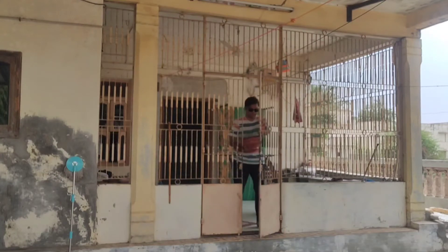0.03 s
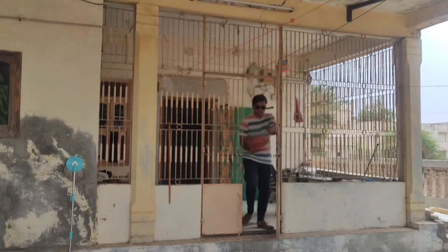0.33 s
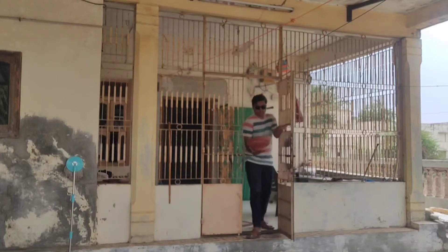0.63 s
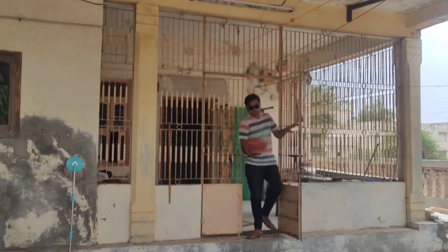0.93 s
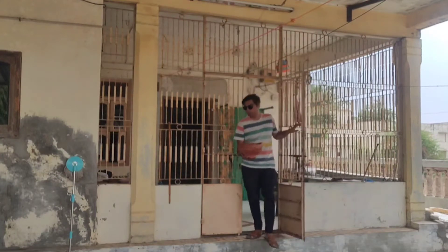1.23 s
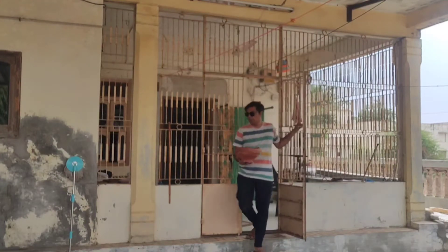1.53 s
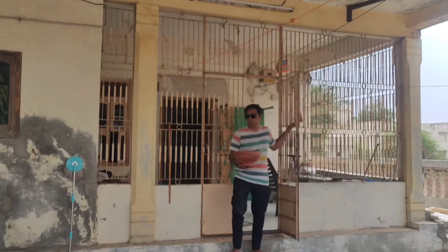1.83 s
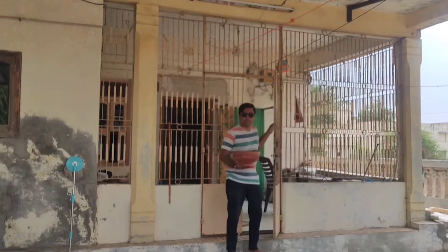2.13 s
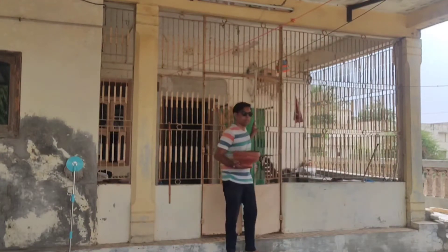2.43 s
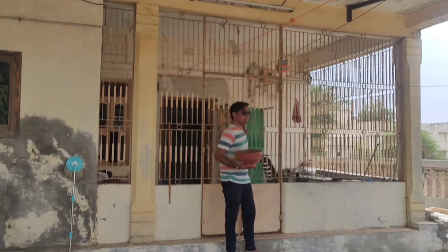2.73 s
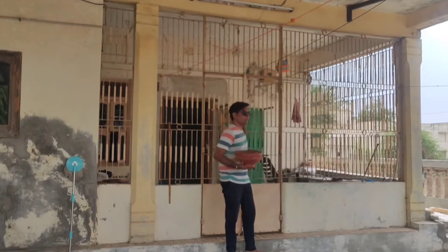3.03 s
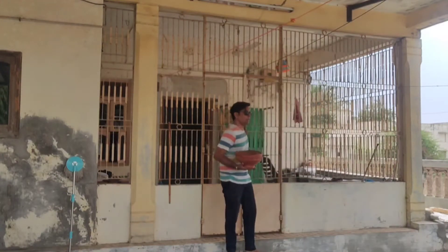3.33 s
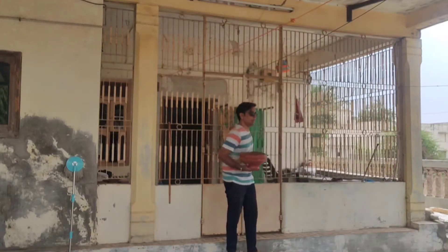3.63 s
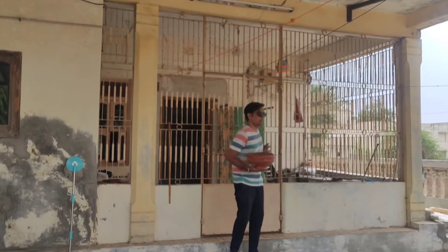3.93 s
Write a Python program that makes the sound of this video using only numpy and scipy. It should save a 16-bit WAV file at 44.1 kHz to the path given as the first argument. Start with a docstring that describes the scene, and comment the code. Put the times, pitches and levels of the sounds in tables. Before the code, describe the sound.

On a veranda with a slight echo, a metal gate swings open with high, wavering squeaks. It squeals again while closing, then bangs against its frame and clatters. Short bird chirps come and go over faint outdoor rumble.

```python
"""An iron grille gate on a masonry veranda is pushed open and swings shut again.
Stick-slip friction makes its dry hinges squeal, whistle, squawk and sing in two modes of the metal.
Impacts on the frame set bars and panel ringing in a bang, a rattle and a later clatter.
A small bird chirps in two voices under the roof. Walls and roof reflect gate and bird,
over faint outdoor rumble and a brief low hum."""
import sys
import numpy as np
from scipy import signal
from scipy.fft import rfft, irfft
from scipy.io import wavfile
from scipy.ndimage import uniform_filter1d

SR = 44100
rng = np.random.default_rng(int(sys.argv[2]) if len(sys.argv) > 2 else 0)


def output_pcm(signal):
    """Save a mono or channel-first signal as 16-bit PCM at the path in sys.argv[1].

    Samples are clipped to [-1, 1] before scaling.
    """
    pcm = np.clip(np.atleast_2d(signal).T, -1, 1) * 32767
    wavfile.write(sys.argv[1], SR, np.round(pcm).astype(np.int16))


N = 176400
T = np.arange(N) / SR


def from_db(db):
    """Amplitude ratio: a factor of ten for every 20 dB."""
    return 10 ** (np.asarray(db) / 20)


def rms_one(x):
    """Normalisation to unit rms."""
    return x / np.sqrt(np.mean(x ** 2) + 1e-20)


def in_time(rows):
    """Linear interpolation of each column after the first (time) at every sample."""
    times, *columns = np.transpose(rows)
    return [np.interp(T, times, column) for column in columns]


def during(rows):
    """A trapezoidal window: one from first row to last, with 10 ms fades outside."""
    return np.clip(1 + 100 * np.minimum(T - rows[0][0], rows[-1][0] - T), 0, 1)


def at_hz(points, hz):
    """Interpolation on a logarithmic frequency axis."""
    freqs, values = np.transpose(points)
    return np.interp(np.log(np.maximum(hz, 1)), np.log(freqs), values)


def drift(rate_hz):
    """Low-pass filtering turns white noise into a smooth wander of unit rms."""
    pole = np.exp(-2 * np.pi * rate_hz / SR)
    return rms_one(signal.lfilter([1], [1, -2 * pole, pole * pole], rng.standard_normal(N + SR))[SR:])


def noise(colour):
    """Spectral shaping of white noise; unit rms."""
    gain = from_db(at_hz(colour, np.fft.rfftfreq(N, 1 / SR)))
    return rms_one(irfft(rfft(rng.standard_normal(N)) * gain, N))


def damped(x, t60s):
    """Frequency-dependent damping: each of 16 bands decays exponentially at its own rate."""
    centres, hz = np.geomspace(60, 16000, 16), np.fft.rfftfreq(N, 1 / SR)
    spectrum = rfft(x)
    bands = [irfft(spectrum * np.interp(hz, centres, share), N) for share in np.eye(16)]
    return sum(band * from_db(-60 * T / at_hz(t60s, c)) for band, c in zip(bands, centres))


def convolve(x, response):
    """A linear system's output is its input convolved with its impulse response."""
    return signal.fftconvolve(x, response)[:N]


def partial(phase, db):
    """A sinusoid of given rms level."""
    return np.sqrt(2) * from_db(db) * np.sin(phase)


def slip_phase(hz, scatter):
    """Phase is the integral of frequency, which uneven slipping scatters by a fraction."""
    return 2 * np.pi * np.cumsum(hz * (1 + scatter * drift(rate_hz=110))) / SR


def rasp(phase, width_hz):
    """Random modulation spreads a tone into a band of noise; unit rms."""
    return rms_one(drift(width_hz) * np.sin(phase) + drift(width_hz) * np.cos(phase))


# The squeal of each swing. Each row: time in seconds, pitch in Hz, levels of harmonics 1-3 in dB.
OPENING_SQUEAL = [(0, 2240, -50, -60, -57), (.046, 2310, -25.5, -39, -33),
                  (.114, 2289, -24.5, -39.5, -28.5), (.16, 2272, -50.5, -45.5, -43.5),
                  (.288, 2244, -32.5, -48.5, -47), (.336, 2238, -56.5, -55.5, -64.5),
                  (.43, 2272, -39, -55, -62)]
CLOSING_SQUEAL = [(2.1, 2383, -53, -85, -84), (2.176, 2347, -36.5, -31, -46),
                  (2.224, 2277, -27, -28.5, -47.5), (2.42, 2318, -26.5, -29, -36),
                  (2.48, 2315, -35, -32, -44.5), (2.6, 2319, -33, -44.5, -45), (2.9, 2356, -44, -49, -55),
                  (3.04, 2306, -41, -48, -55.5), (3.12, 2265, -49.5, -59, -75)]
# Base levels of harmonics 4-6 in dB.
OPENING_TOP_DB = [-51, -64, -64]
CLOSING_TOP_DB = [-51, -67, -66.5]
# Unsteady slip. Each row: time in seconds, pitch scatter as a fraction, share of rasp from 0 to 1.
SLIP_ROUGHNESS = [(.3, 0.006, 0.36), (2.15, .003, 0.18), (2.42, 0.0049, 0.1), (2.6, 0.0066, 0.83)]

def squeal(swing, top_db, brightening_db=13):
    """Stick-slip oscillation gives a harmonic series; rougher slip makes it raspier and brighter."""
    hz, *levels = in_time(swing)
    scatter, roughness = in_time(SLIP_ROUGHNESS)
    swell_db = levels[0] - levels[0].max()  # the top harmonics follow the fundamental
    levels += [db + swell_db + brightening_db * roughness for db in top_db]
    phase = slip_phase(hz, scatter)
    out = np.zeros(N)
    for k, db in enumerate(levels, 1):
        out += np.sqrt(1 - roughness ** 2) * partial(k * phase, db)
        out += roughness * from_db(db) * rasp(k * phase, width_hz=70 * min(k, 2))
    return during(swing) * out


# Spectrum of the rubbing. Each row: frequency in Hz, relative density in dB.
FRICTION_SPECTRUM = [(700, -7.5), (1300, -6), (3000, 0), (6200, -3), (16000, -12)]

def friction_hiss(hinge, spacing_hz=60, spread_db=5.5):
    """Friction noise, filtered by the bars' narrow resonances, swells with the hinge's amplitude."""
    effort = np.sqrt(np.abs(uniform_filter1d(np.abs(hinge), size=4000)))
    spectrum = rfft(noise(FRICTION_SPECTRUM))
    centres = np.arange(0, SR / 2, spacing_hz)
    peaks_db = spread_db * np.clip(rng.standard_normal(len(centres)), -2, 2)
    resonances = from_db(np.interp(np.fft.rfftfreq(N, 1 / SR), centres, peaks_db))
    return effort * rms_one(irfft(spectrum * resonances, N))


# Spectrum of the outdoor air. Each row: frequency in Hz, relative density in dB.
AIR_SPECTRUM = [(25, -39), (60, -7.5), (150, 3), (700, -9), (5000, -28.5), (7500, -31), (10000, -39.5),
                (15500, -35.5)]

def outdoor_rumble():
    """Stationary noise with its power at low frequencies is heard as rumble."""
    return noise(AIR_SPECTRUM)


# Decay of the veranda. Each row: frequency in Hz, reverberation time in seconds.
VERANDA_DECAY = [(150, 1), (2000, 0.55), (5000, 0.49), (8000, 0.42), (14000, 0.1)]

def veranda(early_db=9, early_t60_s=.15, first_echo_s=.004):
    """Reverberation: close reflections from walls and roof, then a diffuse tail; unit energy."""
    tail = damped(rng.standard_normal(N), VERANDA_DECAY)
    early = from_db(early_db - 60 * T / early_t60_s) * rng.standard_normal(N)
    return rms_one((tail + early) * (T > first_echo_s)) / np.sqrt(N)


# One list for each whistle. Each row: time in seconds, pitch in Hz, level in dB.
HINGE_WHISTLES = [
    [(.32, 9265, -48), (.436, 9710, -48.5), (.452, 9335, -27), (.51, 9270, -24.5), (.575, 9190, -47.5)],
    [(.572, 9120, -40), (.6, 8905, -25.5), (.69, 8903, -26.5), (.914, 8750, -52), (1.034, 8830, -36)],
    [(.575, 8590, -38), (.678, 8580, -28.5), (.784, 8430, -32.5), (.9, 8360, -45.5)],
    [(.57, 7070, -43.5), (.606, 7206, -30), (.678, 7044, -31), (.736, 7300, -79)],
]

def whistles():
    """Thin, high whistles from the hinge, each a nearly pure tone with slight frequency modulation."""
    out = np.zeros(N)
    for rows in HINGE_WHISTLES:
        hz, db = in_time(rows)
        out += during(rows) * partial(slip_phase(hz, scatter=.0011), db)
    return out


# The bird's calls. Each row: start in seconds, level in dB, pitch of the low voice in Hz, peak of the
# high voice in Hz, throat resonance in Hz, level of the low voice against the high in dB.
BIRD_CHIRPS = [(0.373, -25, 3950, 10500, 7900, -3.5), (0.453, -27, 3700, 10400, 7400, -10.5),
               (1.164, -28, 4080, 10860, 7700, -1), (1.241, -23.5, 3800, 10500, 7500, -8.5),
               (1.665, -22, 3870, 11030, 8000, -4.5), (1.739, -22, 3530, 10900, 7560, -5),
               (2.211, -21, 3530, 9220, 8630, -10), (2.272, -25, 3500, 10870, 8680, -14.5),
               (2.338, -26.5, 3900, 10660, 8770, -29), (3.424, -28, 4000, 9400, 8120, -5.5),
               (3.506, -30.5, 3830, 9150, 7870, -4)]

def bird(chirp_s=.028, attack_s=.003, foot_hz=5630, rolloff_hz=9250, throat_width_hz=420):
    """Source and filter: a high arched voice sweeps the throat resonance over a low, fading voice."""
    out, along = np.zeros(N), np.linspace(0, 1, int(chirp_s * SR))
    arch = np.sin(np.pi * along)
    envelope = np.minimum(arch * chirp_s / (np.pi * attack_s), 1)
    waver = 1 + .025 * drift(rate_hz=500)
    highpass = signal.butter(2, foot_hz, "high", fs=SR, output="sos")
    hiss = from_db(-15.5) * signal.sosfilt(highpass, rng.standard_normal(N))
    for start, db, low_hz, peak_hz, throat_hz, low_db in BIRD_CHIRPS:
        span = slice(int(start * SR), int(start * SR) + len(along))
        low_pitch = low_hz * (1 + .09 * (arch - .5)) * waver[span]
        low = np.sin(2 * np.pi * np.cumsum(low_pitch) / SR) * from_db(-19 * along)
        high_pitch = (foot_hz + (peak_hz - foot_hz) * arch ** 2) * waver[span]
        high = np.sin(2 * np.pi * np.cumsum(high_pitch) / SR) / (1 + (high_pitch / rolloff_hz) ** 14)
        throat = signal.iirpeak(throat_hz, throat_hz / throat_width_hz, fs=SR)
        high = signal.lfilter(*throat, high) + from_db(-15) * high
        voices = rms_one(high) + from_db(low_db) * rms_one(low)
        out[span] += from_db(db) * rms_one(envelope * (voices + hiss[span]))
    return out


def roof(spray_s=.064):
    """Reflection from the roof returns a short, even spray of echoes; unit energy."""
    return rms_one(rng.standard_normal(N) * np.exp(-(T / spray_s) ** 4)) / np.sqrt(N)


# One list for each squawk. Each row: time in seconds, pitch in Hz, level in dB.
HINGE_SQUAWKS = [
    [(.405, 2580, -62.5), (.425, 2716, -34.5), (.475, 2724, -35.5), (.51, 2987, -46.5), (.555, 3010, -36),
     (.6, 3130, -67.5)],
    [(2.11, 2800, -74), (2.138, 2876, -35.5), (2.185, 2940, -51), (2.21, 2860, -61)],
]
# Offsets of harmonics 1-4 from that level in dB.
SQUAWK_HARMONICS_DB = [7, -16.5, -22.5, -15.5]
CATCH_SCATTER = .016

def squawks():
    """Irregular stick-slip as the hinge catches gives harmonic tones of jittering pitch."""
    out = np.zeros(N)
    for rows in HINGE_SQUAWKS:
        hz, db = in_time(rows)
        phase = slip_phase(hz, CATCH_SCATTER)
        harmonics = sum(partial(k * phase, db + h) for k, h in enumerate(SQUAWK_HARMONICS_DB, 1))
        out += during(rows) * harmonics
    return out


# Grinding of the hinge. Each row: time in seconds, band centre in Hz, level in dB.
HINGE_SCRAPE = [(.42, 5650, -40.5), (.595, 6300, -35), (.7, 6300, -60.5)]

def scrape():
    """Sliding friction in the catching hinge makes a broad, rising band of noise."""
    hz, db = in_time(HINGE_SCRAPE)
    return during(HINGE_SCRAPE) * from_db(db) * rasp(slip_phase(hz, CATCH_SCATTER), width_hz=330)


# Frequencies of the hinge's low and high modes in Hz.
SONG_MODES_HZ = [1601, 2227]
# The song late in the opening swing. Each row: time in seconds, then levels in dB of the low mode,
# high mode, high octave, low octave, sum of low and high, sum of low and high octave.
SONG_LEVELS = [(.72, -49, -68, -89, -64.5, -81, -75), (.8, -44, -53, -44, -42, -44, -47),
               (.89, -27, -31, -44, -52, -42.5, -35), (1.006, -45, -34, -37, -57, -55, -58),
               (1.094, -35.5, -47, -37.5, -53, -55, -52), (1.2, -63, -41, -43.5, -48, -67, -64)]
# Fainter overtones. Each row: multiple of the low mode, multiple of the high mode added to it.
FAINT_TONES = [(2, 1), (0, 3), (0, 5)]
# Their levels in dB against the mean level of the two modes.
FAINT_TONES_DB = [-23.5, -18.5, -19]

def two_mode_song(flutter_db=3):
    """Nonlinear mixing: one contact drives two modes, with harmonics and sum tones that each flutter."""
    low, high = [slip_phase(hz, scatter=.0016) for hz in SONG_MODES_HZ]
    levels = in_time(SONG_LEVELS)
    mean_db = (levels[0] + levels[1]) / 2
    tones = list(zip([low, high, 2 * high, 2 * low, low + high, low + 2 * high], levels))
    tones += [(m * low + n * high, mean_db + db) for (m, n), db in zip(FAINT_TONES, FAINT_TONES_DB)]
    song = sum(partial(phase, db + flutter_db * drift(rate_hz=12)) for phase, db in tones)
    return during(SONG_LEVELS) * song


# A faint hum. Each row: time in seconds, level in dB.
HUM_LEVELS = [(1.68, -58), (2.32, -58)]

def hum(hz=322):
    """A single steady sinusoid is heard as a plain low hum."""
    return during(HUM_LEVELS) * partial(2 * np.pi * hz * T, in_time(HUM_LEVELS)[0])


# The gate strikes its frame. Each row: start in seconds, level in dB, bandwidth of the contact in Hz,
# extra drive to the panel in dB.
FRAME_IMPACTS = [(3.13, -16.5, 10200, -0.5), (3.148, -24.5, 10000, 3.5), (3.178, -19.5, 5850, 4.5),
                 (3.238, -18.5, 3160, 1), (3.26, -27, 2760, 0), (3.286, -29, 3000, 1.5),
                 (3.919, -29.5, 7700, 0), (3.946, -24.5, 5560, -11), (3.991, -20.5, 4540, 4)]
# Dense ringing of the bars. Each row: frequency in Hz, relative density in dB.
BARS_SPECTRUM = [(50, -58), (125, -0.5), (300, -5), (480, -12.5), (637, -13.5), (2300, -17.5), (4900, -20),
                 (6380, -18.5), (9500, -21.5), (15500, -38)]
# Damping of the bars. Each row: frequency in Hz, time to fall 60 dB in seconds.
BARS_DECAY = [(100, 0.11), (500, 0.64), (2000, 0.48), (14000, 0.43)]
# Sheet panel and frame. Each row: frequency in Hz, relative level in dB, time to fall 60 dB in seconds.
PANEL_MODES = [(251.3, -9, 1), (395, -6.5, 0.7), (504.6, 1.5, 0.71), (938, 0, 0.44), (1096, -11.5, 0.23)]

def gate_impacts():
    """Impulse excitation: each blow rings bars and panel; a narrower contact bandwidth sounds duller."""
    bars = damped(noise(BARS_SPECTRUM), BARS_DECAY)
    panel = sum(rng.choice([-1, 1]) * from_db(db - 60 * T / t60) * np.sin(2 * np.pi * hz * T)
                for hz, db, t60 in PANEL_MODES)
    on_bars, on_panel = np.zeros((2, N))
    for start, db, bandwidth_hz, panel_db in FRAME_IMPACTS:
        impulse = from_db(db) * (np.arange(N) == int(start * SR)) + 1e-18
        force = signal.lfilter(*signal.butter(2, bandwidth_hz, fs=SR), impulse)
        on_bars += force
        on_panel += from_db(panel_db) * force
    return convolve(on_bars, bars) + from_db(-10.5) * convolve(on_panel, panel)


def scene():
    """Superposition: direct sound from gate and bird adds to its reflections and the background."""
    creaks = two_mode_song() + scrape() + squawks() + whistles()
    squeals = squeal(OPENING_SQUEAL, OPENING_TOP_DB) + squeal(CLOSING_SQUEAL, CLOSING_TOP_DB)
    hiss = friction_hiss(creaks + .14 * squeals)  # the clean squeal carries less hiss
    hinge = from_db(1.5) * (creaks + squeals) + from_db(-33.5) * hiss
    chirps, bangs = bird(), gate_impacts()
    direct = hinge + from_db(-13) * chirps + bangs
    reverb = convolve(from_db(-4) * hinge + from_db(-7.5) * chirps + from_db(-10) * bangs, veranda())
    background = from_db(-52) * outdoor_rumble() + hum()
    roof_echoes = from_db(-7.5) * convolve(chirps, roof())
    return (direct + reverb + roof_echoes + background)[None]


def record(dry, stopband_hz=16500):
    """Band limiting: a steep low-pass filter removes the highest treble."""
    return signal.sosfilt(signal.cheby2(16, 70, stopband_hz, fs=SR, output="sos"), dry)


dry = scene()
out = record(dry)
output_pcm(out)
```